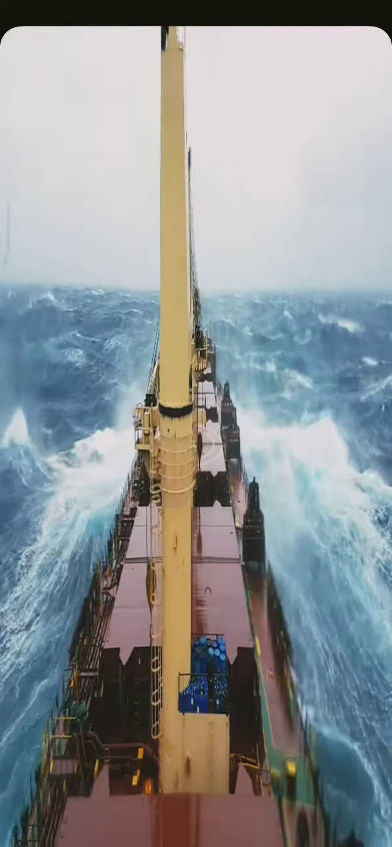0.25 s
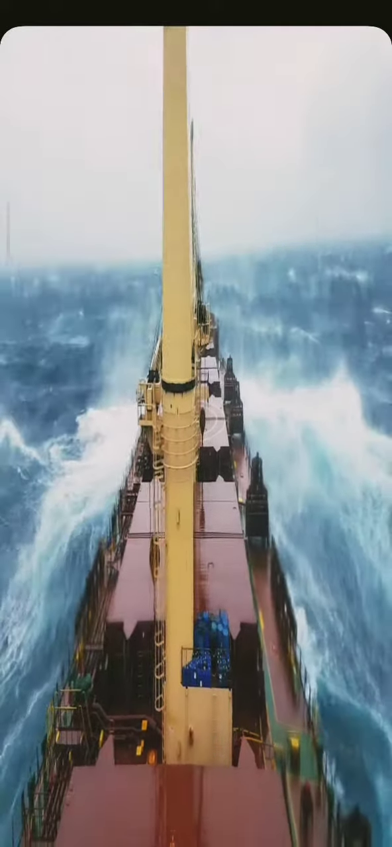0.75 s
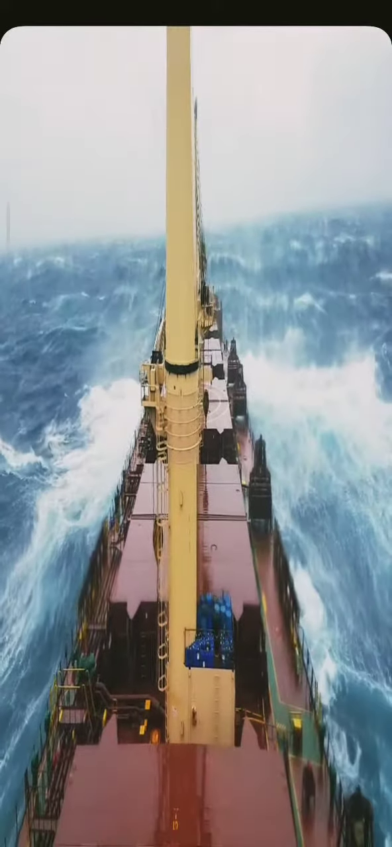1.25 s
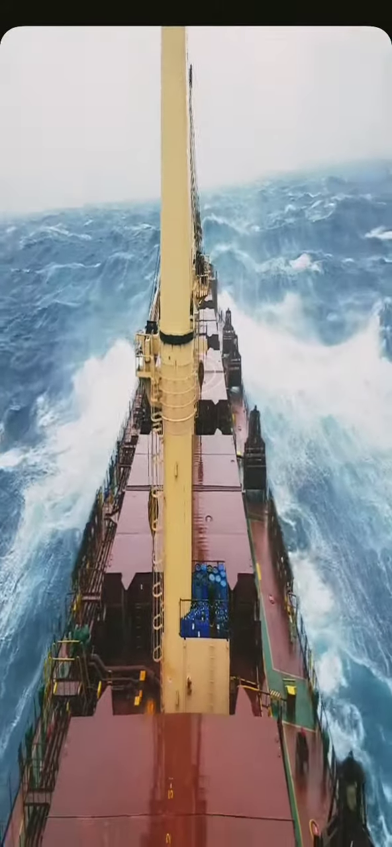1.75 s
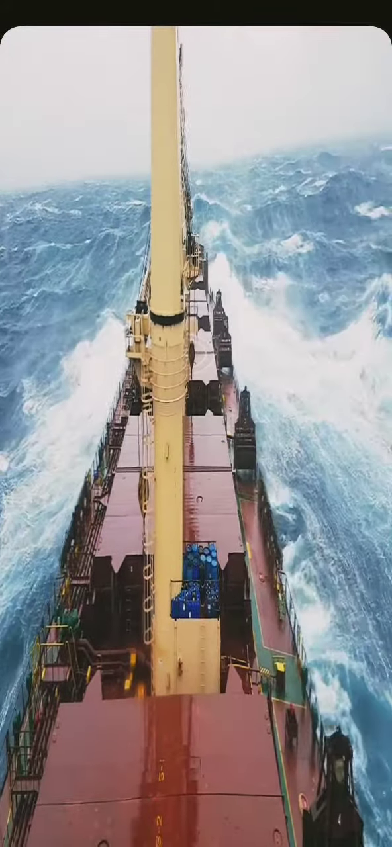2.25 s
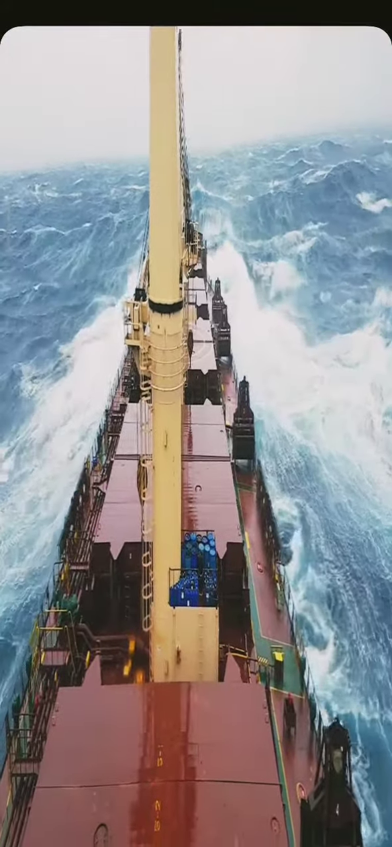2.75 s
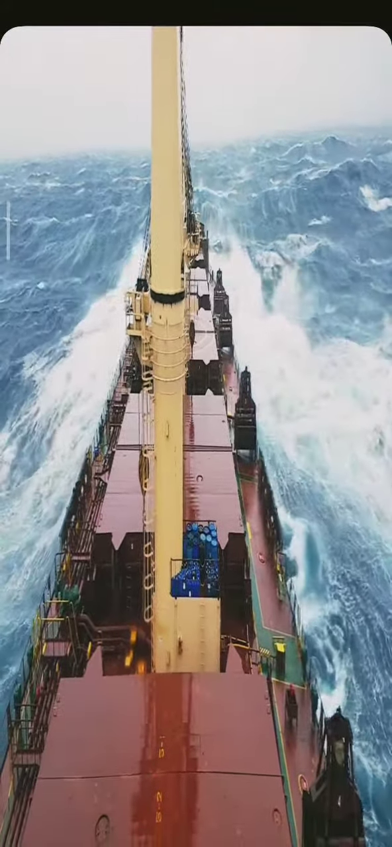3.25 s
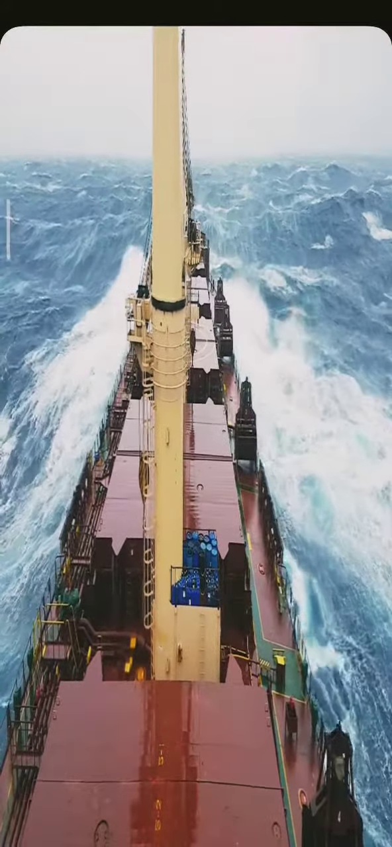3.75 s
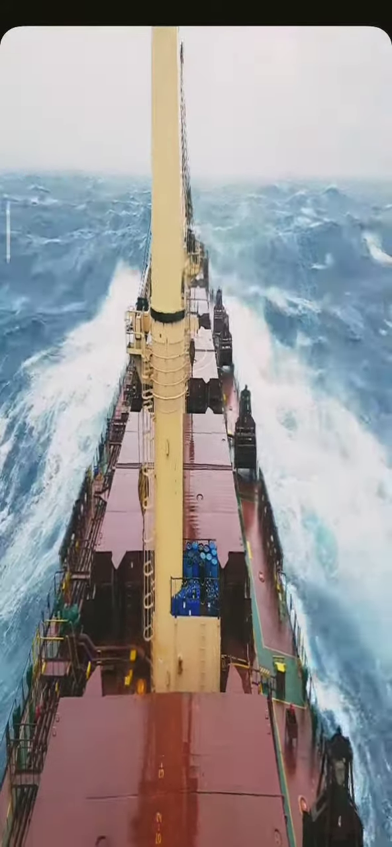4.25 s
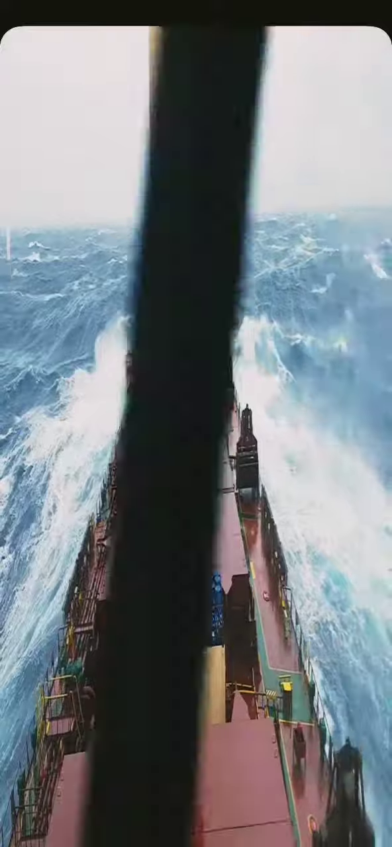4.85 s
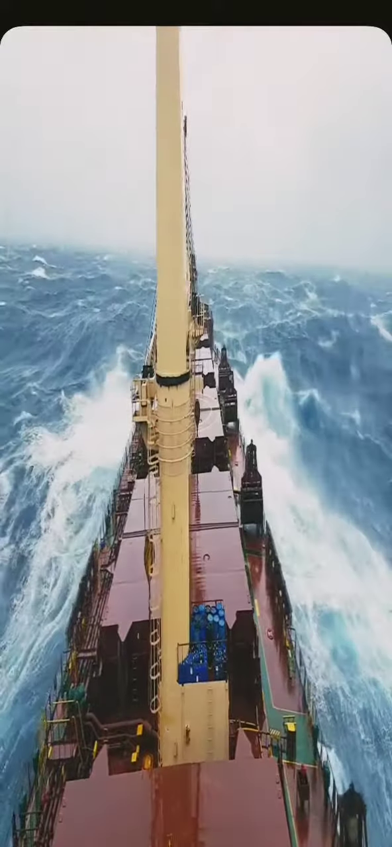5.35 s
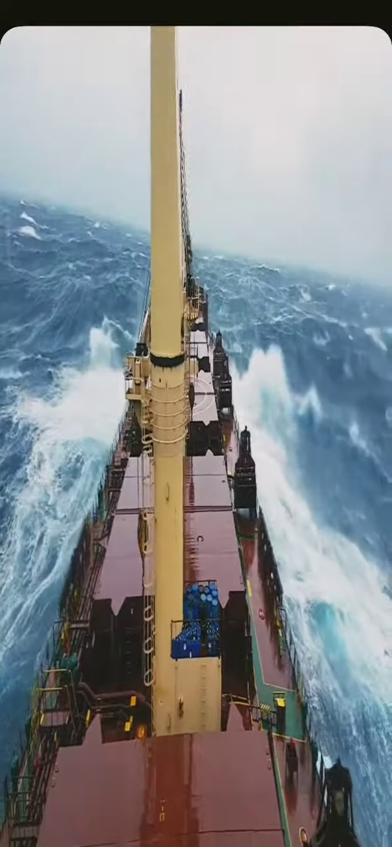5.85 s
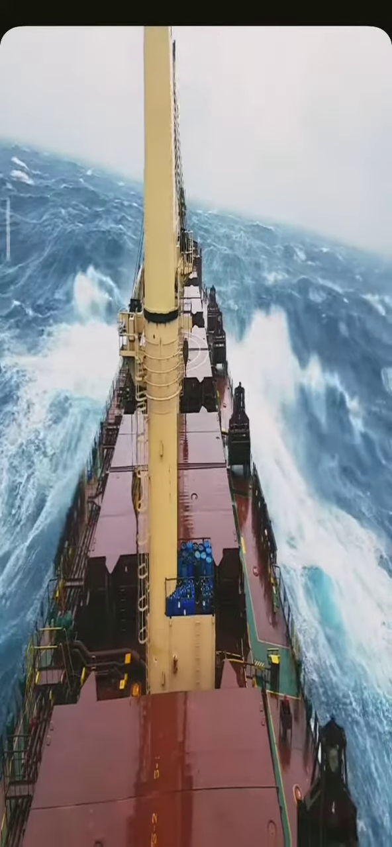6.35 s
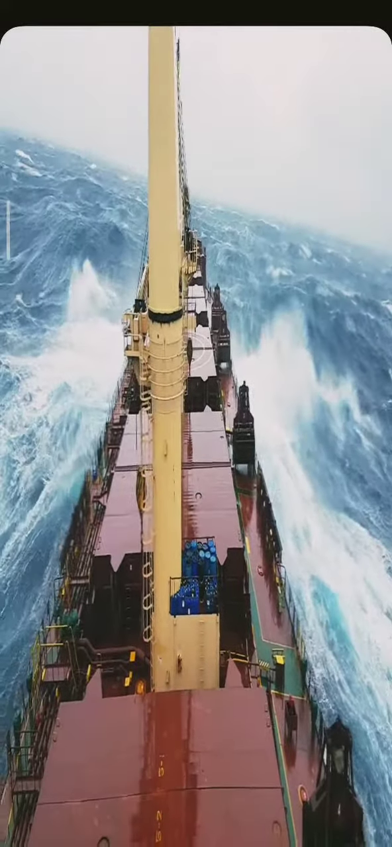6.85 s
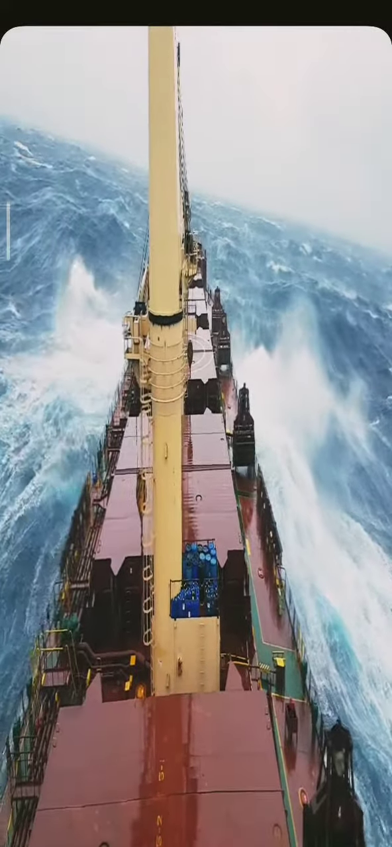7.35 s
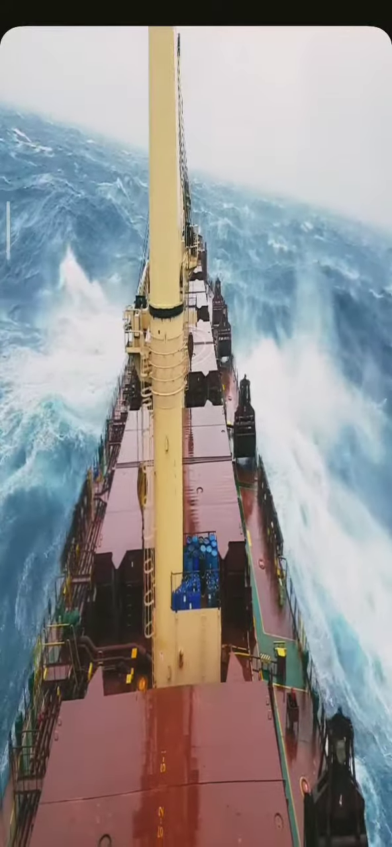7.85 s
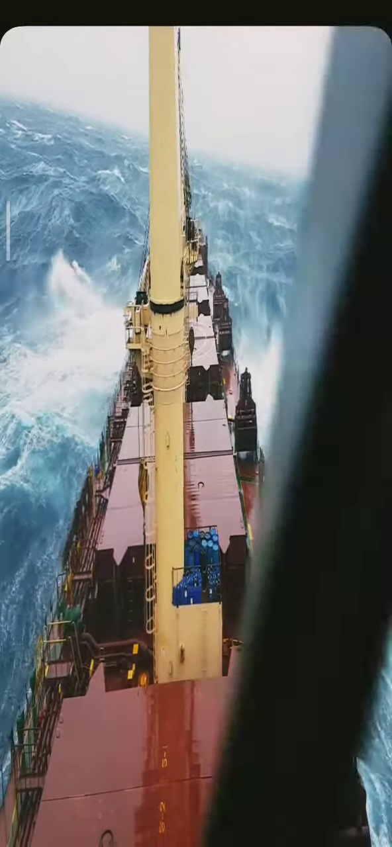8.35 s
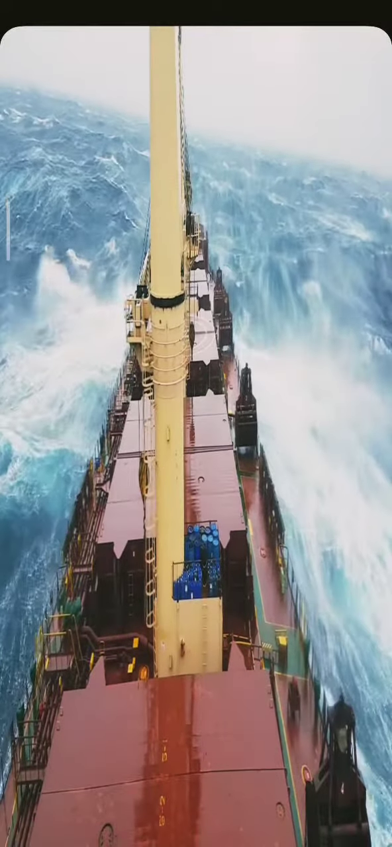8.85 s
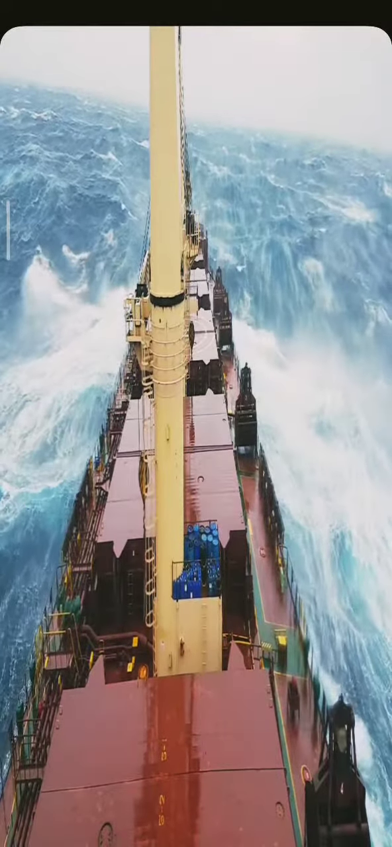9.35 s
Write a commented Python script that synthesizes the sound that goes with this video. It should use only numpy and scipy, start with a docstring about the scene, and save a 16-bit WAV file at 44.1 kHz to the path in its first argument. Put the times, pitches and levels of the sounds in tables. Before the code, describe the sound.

Storm wind moans over a low ship engine hum and muffled rough waves, while spray patters on windows and loose fittings faintly buzz.

```python
"""Cargo ship's bridge in a heavy sea.

The engine drones through the steelwork and sets a loose panel buzzing against its frame.
The gale moans round the deckhouse over the dull rush of the waves, and the hull booms as seas strike it.
Spray spatters on the windows, and loose fittings rattle, tick and clink as the ship rolls."""
import sys
import numpy as np
from scipy import signal
from scipy.fft import rfft, irfft, next_fast_len
from scipy.io import wavfile
from scipy.ndimage import uniform_filter1d

SR = 44100
rng = np.random.default_rng(int(sys.argv[2]) if len(sys.argv) > 2 else 0)


def int16_out(signal):
    """Quantize to a 16-bit WAV file."""
    q = np.round(np.clip(np.atleast_2d(signal).T, -1, 1) * 32767)
    wavfile.write(sys.argv[1], SR, q.astype(np.int16))


N = 422917

# gusts and lulls of the gale: time_s, strength_db
GALE = [(0, -27), (.6, -22), (1.05, -25.5), (2.0, -26), (2.3, -30), (2.55, -26.5), (3.0, -39), (3.5, -44),
        (4.1, -32), (4.4, -39), (5.1, -40.5), (5.9, -30.5), (6.5, -27), (7.5, -28), (8.4, -39.5),
        (8.8, -31.5), (9.59, -29.5)]
USUAL_GALE_DB = -32.5   # midway between gust and lull


def from_db(db):
    """Decibels to gain."""
    return 10 ** (np.asarray(db) / 20)


def unit_rms(x):
    """Scale to rms 1."""
    return x / np.sqrt(np.mean(np.abs(x) ** 2) + 1e-20)


def curve(rows):
    """Join (time_s, value) points into a value for every sample."""
    times, values = np.transpose(rows)
    return np.interp(np.arange(N) / SR, times, values)


def drift(rate_hz):
    """Smooth random wander, rms 1, moving at up to about rate_hz."""
    step, run_in = 8, 8000
    lowpass = signal.butter(2, np.clip(rate_hz, .1, SR / 20), fs=SR / step, output="sos")
    slow = signal.sosfilt(lowpass, rng.standard_normal(N // step + run_in + 2))[run_in:]
    return np.interp(np.arange(N) / step, np.arange(len(slow)), unit_rms(slow))


def phase_of(hz):
    """Phase in radians of a steady or gliding pitch."""
    return 2 * np.pi * np.cumsum(hz * np.ones(N)) / SR


def coloured(spectrum):
    """Noise shaped by (freq_hz, gain_db) points and rolled off beyond them, rms 1."""
    size = next_fast_len(N)
    hz, db = np.transpose(spectrum)
    bins = np.maximum(np.arange(size // 2 + 1) * SR / size, 1)
    gain = from_db(np.interp(np.log(bins), np.log(hz), db))
    gain *= np.minimum(bins / hz[0], 1) ** 2 * np.minimum(hz[-1] / bins, 1) ** 2
    return unit_rms(irfft(rfft(rng.standard_normal(size)) * gain, size)[:N])


def resonance(hz, width_hz, steadiness=0):
    """A resonance stirred at random, rms 1; steadiness (0 to 1) evens out its swing."""
    swing = drift(width_hz / 2) + 1j * drift(width_hz / 2)
    swing = swing / (np.abs(swing) + .1) ** steadiness
    return unit_rms(np.real(swing * np.exp(1j * phase_of(hz))))


def stirred(modes):
    """A bank of randomly stirred resonances."""
    return sum(from_db(db) * resonance(hz, width) for hz, width, db in modes)


def evened(x, span_s):
    """Level out swells slower than span_s and keep the faster beating, rms 1."""
    size = round(span_s * SR)
    power = uniform_filter1d(uniform_filter1d(x ** 2, size), size)
    return unit_rms(x / np.sqrt(np.abs(power) + 1e-9))


def clicks(rows):
    """One impulse for each (start_s, level_db)."""
    out = np.zeros(N)
    for start_s, db in rows:
        out[min(round(start_s * SR), N - 1)] += from_db(db)
    return out


def ring(hits, hz, t60_s):
    """Each click sets a damped sine ringing."""
    decay, angle = from_db(-60 / (t60_s * SR)), 2 * np.pi * hz / SR
    return signal.lfilter([0, np.sin(angle)], [1, -2 * decay * np.cos(angle), decay ** 2], hits + 1e-18)


def fade(hits, t60_s):
    """An envelope that jumps at each click and dies away."""
    return signal.lfilter([1], [1, -from_db(-60 / (t60_s * SR))], hits + 1e-18)


def weather(sea_db, hiss_db, flutter_db, surge_db):
    """Hull rumble, wind, and seas and spume that lift a little in gusts, dulled by the cabin walls."""
    # colours of the hull, breaking seas, wind and blown spume: freq_hz, gain_db
    rumble_colour = [(15, -3.5), (25, 0), (38, 2.5), (60, 0), (85, 2.5), (130, -0.5), (220, -8), (400, -31)]
    sea_colour = [(120, -11), (200, 4.5), (290, 1), (345, 1.5), (400, -4.5), (460, -3), (560, -5.5),
                  (700, -7), (770, -12.5), (1000, -16.5), (1500, -30.5), (3000, -56)]
    wind_colour = [(500, -13.5), (850, -2.5), (1020, -1), (1130, -0.5), (1280, 1.5), (1620, -4.5),
                   (1900, -14), (3000, -36.5)]
    spume_colour = [(1300, -10), (1900, -5.5), (2300, -0.5), (2900, -1), (3400, -6.5), (4000, -11),
                    (4600, -19), (6500, -24.5), (8300, -25.5), (9600, -32.5), (15500, -32)]
    # slow swells of the rumble and the wind: time_s, level_db
    rumble_level = [(0, -41), (1.25, -37.5), (3.9, -40.5), (4.55, -36), (6.3, -41), (6.8, -38), (8.6, -38),
                    (9.1, -43.5), (9.59, -36.5)]
    wind_level = [(0, -51.5), (1.3, -52), (3.0, -55), (4.2, -52.5), (5.75, -50.5), (7.5, -52.5),
                  (9.59, -52.5)]
    gust_db = curve(GALE) - USUAL_GALE_DB
    flutter = flutter_db * drift(18)
    rumble = from_db(curve(rumble_level)) * coloured(rumble_colour)
    sea = from_db(sea_db + .076 * gust_db + surge_db * drift(5.9)) * coloured(sea_colour)
    wind = from_db(curve(wind_level) + flutter) * coloured(wind_colour)
    spume = from_db(hiss_db + .14 * gust_db + flutter) * coloured(spume_colour)
    return rumble + sea + wind + spume


def cabin():
    """The wind keeps the cabin's resonances humming."""
    # cabin modes: pitch_hz, width_hz, level_db
    modes = [(96.2, 9, -40), (128.2, 12, -41), (152.2, 9, -40), (218, 14, -43), (310, 16, -48.5),
             (504.8, 10, -52), (606, 19, -55), (672.4, 20, -53), (724, 23, -58.5), (830, 33, -57.5),
             (887, 16, -64), (1023, 30, -64), (1583, 120, -67)]
    return stirred(modes)


def booms(width_hz):
    """Seas strike the hull: short low swells of the plating, each at one pitch."""
    # blows on the hull: centre_s, level_db, pitch_hz, half_length_s
    blows = [(0.302, -30.5, 152, 0.07), (1.365, -27.5, 151, 0.1), (4.898, -32, 99.6, 0.18),
             (4.95, -35, 66, .1), (8.524, -36.5, 76, 0.1), (8.605, -40, 51, .15)]
    t = np.arange(N) / SR
    return sum(from_db(db) * np.exp(-((t - centre_s) / half_s) ** 2) * resonance(hz, width_hz, 1)
               for centre_s, db, hz, half_s in blows)


def slaps(rise_s, t60_s):
    """Heavy sheets of water land softly on the deckhouse and drain away."""
    # landings: start_s, level_db
    sheets = [(.875, -52.5), (5.72, -53), (7.1, -54.5), (8.04, -49)]
    # their dull splash: freq_hz, gain_db
    colour = [(900, 1), (1500, -3.5), (3000, -9.5), (6000, -29.5)]
    envelope = uniform_filter1d(fade(clicks(sheets), t60_s), round(rise_s * SR))
    return envelope * coloured(colour)


def spray(trim_db, t60_s, patchy_db, grain_db, sizzle_t60_s, drops_per_s):
    """Bursts of fine drops hit the glass and thin out, over a patchy patter with a few larger drops."""
    # dashes of spray and thin high sizzles: start_s, level_db
    dashes = [(0.4244, -53.5), (0.7736, -56.5), (0.8794, -59), (0.937, -52.5), (1.0829, -55), (1.2531, -56),
              (1.4167, -58), (1.5694, -58), (1.6636, -54), (1.769, -56.5), (1.9709, -54), (2.0398, -51),
              (2.2159, -56), (2.2583, -56), (3.7803, -65), (6.2786, -53.5), (6.3394, -56), (6.8857, -56),
              (6.9894, -62.5), (7.0683, -53.5), (7.1601, -52), (8.0551, -54), (9.5417, -54.5)]
    sizzles = [(0.14, -77), (0.24, -76), (0.88, -75), (1.57, -78), (3.78, -77)]
    # drizzle between the dashes, and a brief skitter of the metal piece near 5.35 s: time_s, level_db
    patter_level = [(0, -80), (.6, -73), (2.5, -76), (3.5, -81.5), (5.15, -88), (5.35, -72.5), (5.7, -81.5),
                    (7.15, -73.5), (9.59, -77.5)]
    # colour of drops on glass: freq_hz, gain_db
    colour = [(1500, -4.5), (3000, 8.5), (4500, 4.5), (6500, -0.5), (8500, -6), (10000, -9.5),
              (15500, -14.5)]
    large_drops = from_db(9.5) * fade(rng.random(N) < drops_per_s / SR, t60_s=.04)
    patter = from_db(curve(patter_level)) * np.hypot(from_db(patchy_db * drift(25)), large_drops)
    envelope = np.hypot(from_db(trim_db) * fade(clicks(dashes), t60_s), patter)   # powers add
    sizzle_noise = coloured([(8000, -16.5), (11000, 1.0), (13500, -1), (15500, 1.5)])
    sizzle = fade(clicks(sizzles), sizzle_t60_s) * sizzle_noise
    grain = unit_rms(from_db(grain_db * drift(400)))
    return envelope * grain * coloured(colour) + sizzle


def latch(trim_db, t60_s, chatter_db, flutter_db, shakes_per_s):
    """A loose latch chatters brightly; as the ship leans on it, it fizzes and shakes more often."""
    # the hardest shakes: start_s, level_db
    hard_shakes = [(1.297, -54), (1.7194, -57.5), (1.8951, -58.5), (2.36, -58.5), (2.6294, -61),
                   (2.9194, -60), (3.271, -57), (3.4096, -56), (3.4745, -56), (3.6536, -55.5),
                   (3.7189, -55), (3.7715, -50), (3.8342, -55), (3.8681, -59)]
    # the ship's lean, as the level of the fizz: time_s, level_db
    lean = [(0, -74.5), (0.7, -68.5), (2.1, -70.5), (3.85, -70), (5.0, -89.5), (9.59, -93.5)]
    # modes of the rattle and of the fizz: pitch_hz, width_hz, level_db
    rattle_modes = [(3780, 310, 2.5), (4230, 300, -10), (7900, 500, -14), (8500, 300, -17.5)]
    fizz_modes = [(1958, 600, 6.5), (3810, 220, -8.5), (4300, 1500, -12.5), (8200, 800, -24.5)]
    lean_db = curve(lean)
    light_shakes = rng.random(N) < shakes_per_s * from_db(lean_db - lean_db.max()) / SR
    hits = clicks(hard_shakes) + from_db(-63.5) * light_shakes
    rattle = from_db(trim_db - chatter_db * drift(150)) * fade(hits, t60_s) * stirred(rattle_modes)
    fizz = from_db(lean_db + flutter_db * drift(30)) * stirred(fizz_modes)
    return rattle + fizz


def ticks(snap_hz, snap_t60_s):
    """Loose fittings tick dryly: each contact is a short snap and one damped mode."""
    # two dull knocks and one faint, bright click, each with its own top:
    # start_s, level_db, pitch_hz, t60_s, snap_db, top_hz
    contacts = [(0.6355, -15.5, 1580, 0.0036, 2, 3000), (5.3568, -25.5, 1586, 0.022, 3, 3270),
                (9.3038, -26.5, 1810, 0.00036, 4, 15000)]
    out = np.zeros(N)
    for start_s, db, hz, t60_s, snap_db, top_hz in contacts:
        hit = clicks([(start_s, db)])
        band = signal.butter(4, [700, top_hz], "band", fs=SR, output="sos")
        snap = hit + ring(hit, snap_hz, min(snap_t60_s, t60_s))
        out += signal.sosfilt(band, ring(hit, hz, t60_s) + from_db(snap_db) * snap)
    return out


def clink(scuff_db, scuff_t60_s):
    """A small metal piece lands with a bright scuff and rings roughly as it bounces."""
    # bounces: start_s, level_db
    bounces = [(5.204, -64), (5.2085, -60.5), (5.233, -82), (5.267, -74), (5.31, -78)]
    # modes of the metal: pitch_hz, width_hz, level_db, t60_s
    modes = [(4300, 140, 1.5, 0.089), (5000, 240, -5.5, 0.24), (5938, 130, -9, 0.3), (8888, 150, -11, 0.22),
             (10900, 240, -13, 0.18), (13650, 600, -8, 0.11), (15050, 240, -15, 0.11)]
    hits = clicks(bounces)
    scuff = fade(hits, scuff_t60_s) * coloured([(3500, -9), (4300, 4), (15000, -3)])
    ringing = sum(from_db(db) * fade(hits, t60_s) * resonance(hz, width, steadiness=.55)
                  for hz, width, db, t60_s in modes)
    return from_db(scuff_db) * scuff + ringing


def moan(upper_trim_db, lower_trim_db, even_s, waver_db, bend_hz_per_db):
    """Eddies shed by the deckhouse drive a low note and a beating upper pair that sharpens in gusts."""
    # upper pair with a breathy band, in the usual gale; then the low note: pitch_hz, width_hz, level_db
    upper_modes = [(235.2, 13.8, -0.5), (261, 8, -6), (315, 90, -15.5)]
    lower_modes = [(186.7, 9, 0)]
    # the low note takes over in the long lull: time_s, level_db
    lower_level = [(0, -38.5), (2.85, -37.5), (3.25, -29), (3.9, -34), (5.5, -30.5), (6.3, -42),
                   (9.59, -40)]
    gale_db = curve(GALE)
    bend_hz = bend_hz_per_db * (gale_db - USUAL_GALE_DB)
    bent_modes = [(hz + bend_hz, width, db) for hz, width, db in upper_modes]
    upper = from_db(gale_db + upper_trim_db + waver_db * drift(10)) * evened(stirred(bent_modes), even_s)
    lower_db = curve(lower_level) + lower_trim_db + waver_db * drift(9)
    return upper + from_db(lower_db) * evened(stirred(lower_modes), even_s)


def panel(phase, drone_db, ring_db, ceiling_db, sharpness, pulse_depth):
    """A loose panel scrapes its frame once per engine cycle, unevenly in weak bouts, steadier in strong."""
    # how freely it sits as the ship rolls: time_s, slack_db
    slack = [(0, -29), (3.7, -24), (4.5, -5.5), (5.3, 0), (6.2, -3.5), (7.6, -4), (8.15, 1.5), (8.7, -4.5),
             (9.59, -0.5)]
    # bouts of chatter: start_s, length_s, push_db
    chatters = [(4.12, .05, -80), (4.23, .3, -84), (6.12, .07, -78), (6.25, 0.37, -82.5), (6.757, .17, -79),
                (7.03, 0.13, -74), (7.29, .09, -74.5), (7.59, 0.18, -79), (7.79, .73, -70.5),
                (8.6, .23, -79), (8.853, 0.45, -69)]
    # modes of the panel: pitch_hz, width_hz, level_db
    low_modes = [(2518, 300, 5), (2914, 350, -7), (3960, 190, -10.5)]
    high_modes = [(4900, 500, -8.5), (5970, 120, -2), (7000, 600, -16), (8550, 450, -13.5),
                  (9400, 250, -21), (10350, 400, -16.5), (11680, 350, -14), (12750, 450, -22),
                  (15200, 400, -24)]
    full_drone_db, between_bouts_db, edge_s = -22.5, -92.5, .03
    shaking = from_db(curve(slack) + .72 * (drone_db - full_drone_db))
    t = np.arange(N) / SR
    bouts = sum(from_db(db) * np.clip(np.minimum(t - start, start + length - t) / edge_s + .5, 0, 1)
                for start, length, db in chatters)
    unevenness = from_db(4.5 * drift(70) + 2.5 * drift(13))
    push = (bouts + from_db(between_bouts_db) * shaking) * unevenness
    force = from_db(ceiling_db) * np.tanh(push / from_db(ceiling_db))   # hard pushes level off
    pulses = unit_rms(np.exp(sharpness * (np.cos(phase) - 1)))
    high = force * pulses * evened(stirred(high_modes), span_s=.0043)
    # the low modes ring on from one touch to the next, louder as the drone swells
    low = from_db(ring_db) * shaking * (1 - pulse_depth + pulse_depth * pulses) * stirred(low_modes)
    return high + low


def engine(phase, drone_db, trim_db, waver_db, weak_waver_db):
    """A near-pure drone carried by the steelwork; the weaker it is, the more it wavers."""
    # partials of the drone: multiple, level_db
    partials = [(1, 1.5), (2, -24), (3, -29)]
    tone = sum(from_db(db) * np.sin(k * phase + rng.uniform(0, 2 * np.pi)) for k, db in partials)
    weakness = (drone_db.max() - drone_db) / np.ptp(drone_db)
    waver = (waver_db + weak_waver_db * weakness) * drift(8.3)
    return from_db(drone_db + trim_db + waver) * unit_rms(tone)


def scene():
    """Everything heard at the bridge window, in mono."""
    # the engine races and labours a little with the seas: time_s, pitch_hz
    engine_pitch = [(0, 121.4), (2.3, 121.5), (4.2, 119.7), (5.4, 121.2), (6.2, 120.5), (9.59, 120.9)]
    # its drone swells and sinks as the hull works: time_s, level_db
    engine_level = [(0.0, -40.5), (0.77, -32), (1.15, -35.5), (1.57, -47.5), (1.71, -40), (1.89, -43),
                    (1.95, -32), (2.11, -38.5), (2.43, -23.5), (2.51, -36), (2.56, -26), (2.64, -33.5),
                    (2.75, -25), (3.31, -36.5), (3.36, -31), (3.87, -40), (3.9, -44), (4.06, -26.5),
                    (4.59, -30), (4.73, -40.5), (4.78, -33), (5.23, -42), (5.31, -29), (5.72, -39),
                    (6.09, -34), (6.14, -25.5), (6.94, -26.5), (9.21, -23), (9.48, -44), (9.59, -29.5)]
    phase, drone_db = phase_of(curve(engine_pitch)), curve(engine_level)
    mix = engine(phase, drone_db, trim_db=-.05, waver_db=.82, weak_waver_db=2.5)
    mix += panel(phase, drone_db, ring_db=-61.5, ceiling_db=-70, sharpness=1.7, pulse_depth=.3)
    mix += weather(sea_db=-37.5, hiss_db=-63.5, flutter_db=1.15, surge_db=.5)
    mix += moan(upper_trim_db=-1.34, lower_trim_db=-1, even_s=.11, waver_db=1.06, bend_hz_per_db=.5)
    mix += cabin() + booms(width_hz=9)
    mix += spray(trim_db=-8.5, t60_s=.18, patchy_db=3, grain_db=1, sizzle_t60_s=.65, drops_per_s=11)
    mix += slaps(rise_s=.03, t60_s=.88)
    mix += latch(trim_db=-7, t60_s=.078, chatter_db=1.5, flutter_db=2, shakes_per_s=6)
    mix += ticks(snap_hz=2320, snap_t60_s=.0015) + clink(scuff_db=-5, scuff_t60_s=.085)
    return mix[None]


def record(dry):
    """The sound eases in over a few milliseconds; the top is cut steeply."""
    ease_s, cutoff_hz = .004, 15750
    ease = np.minimum(np.arange(N) / (ease_s * SR), 1)
    return signal.sosfilt(signal.ellip(10, .1, 70, cutoff_hz, fs=SR, output="sos"), dry * ease)


dry = scene()
out = record(dry)
int16_out(out)
```